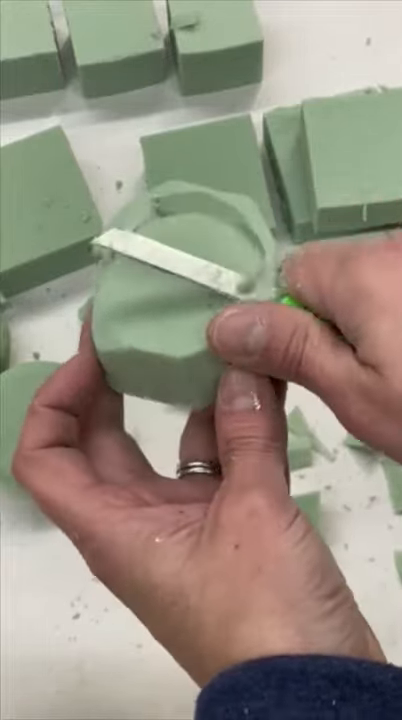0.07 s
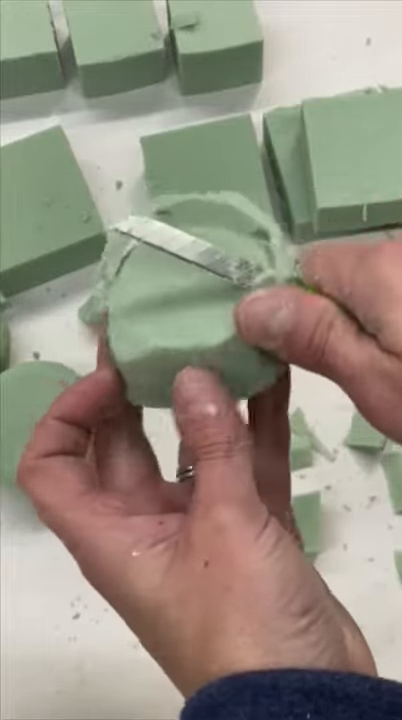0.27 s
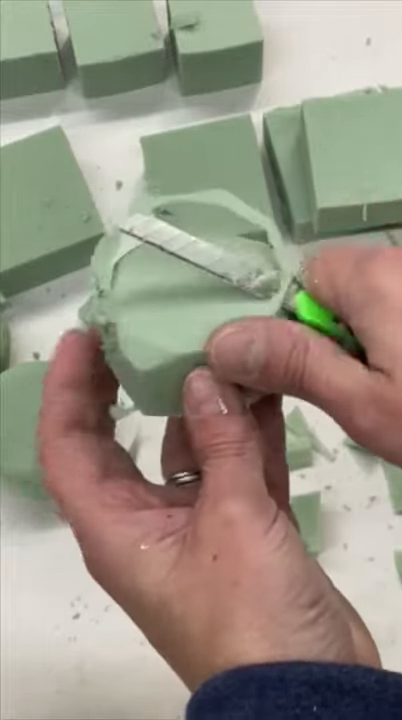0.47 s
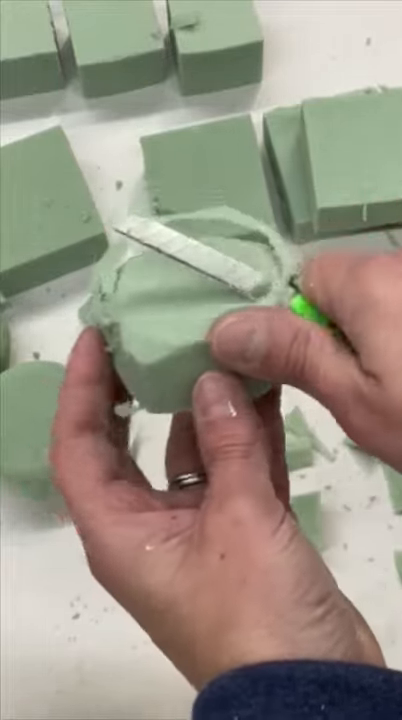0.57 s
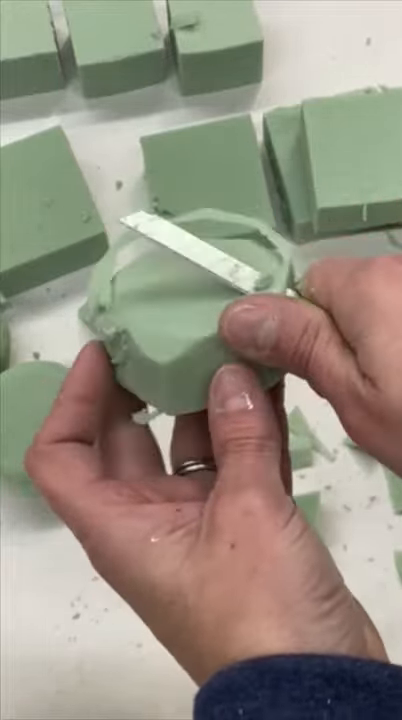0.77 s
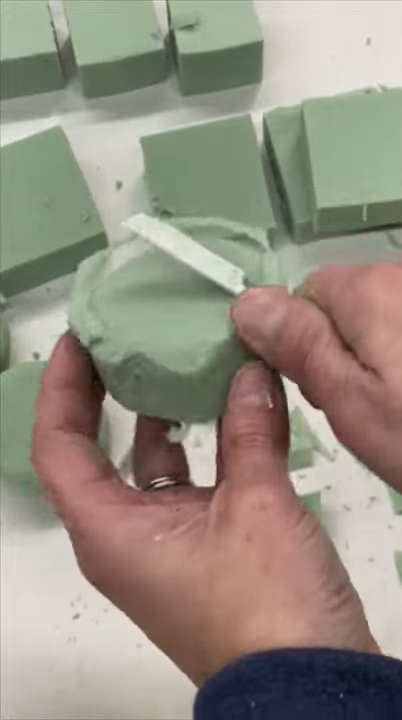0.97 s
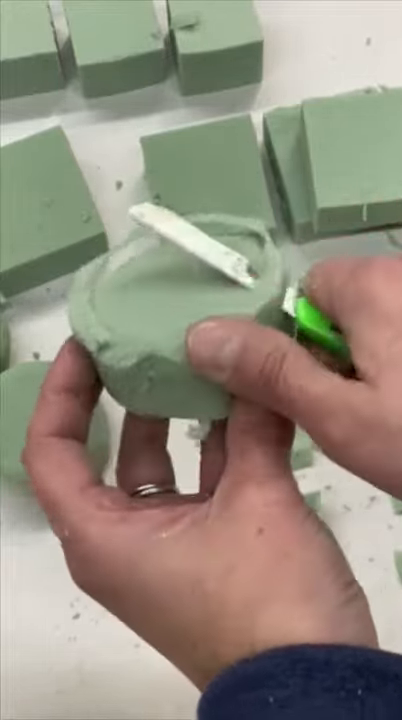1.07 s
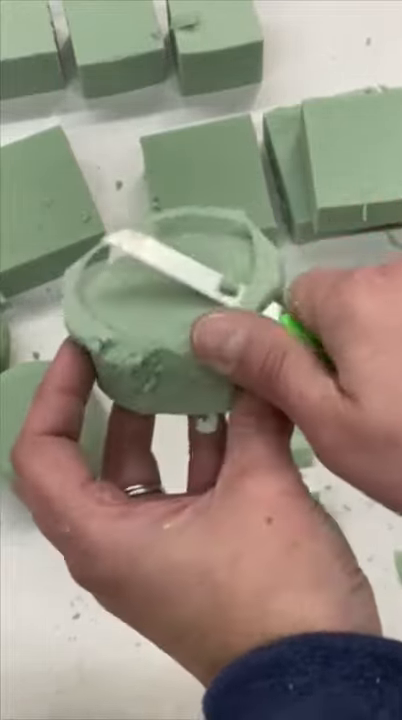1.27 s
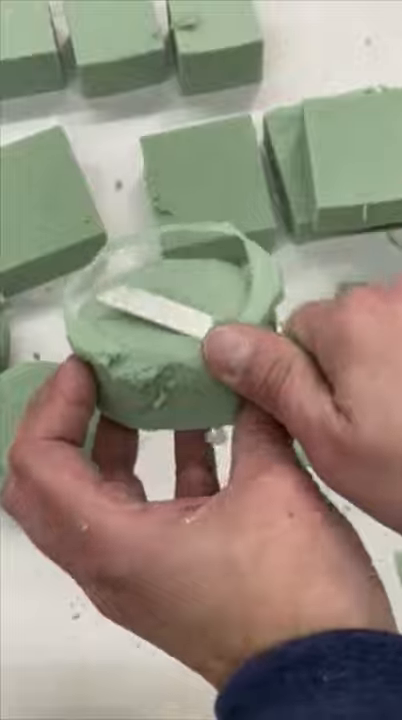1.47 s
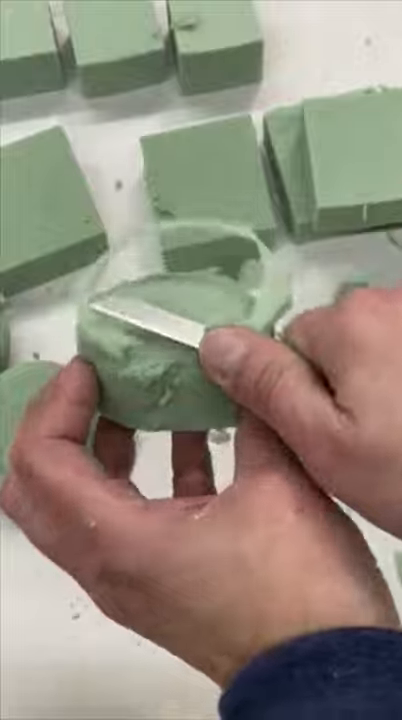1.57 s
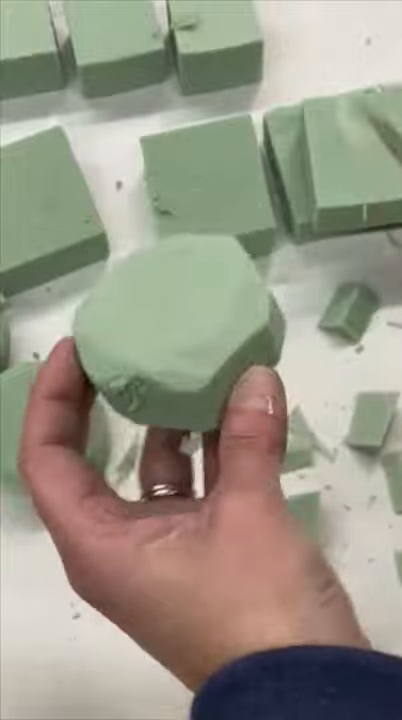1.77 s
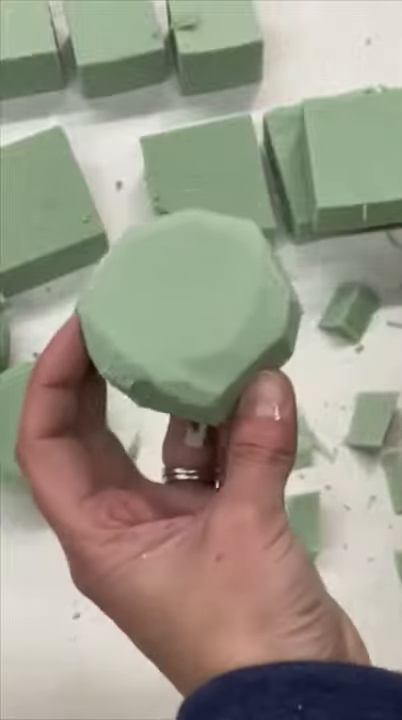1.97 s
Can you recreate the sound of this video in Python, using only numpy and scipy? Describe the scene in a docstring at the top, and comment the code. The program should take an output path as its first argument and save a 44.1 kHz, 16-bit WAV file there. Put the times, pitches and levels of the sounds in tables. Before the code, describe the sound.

Crunchy knife cuts through brittle foam, close up, then faint finger rubs over a quiet hum.

```python
"""A box-cutter blade shaves the rim of a disc of dry floral foam, close to a phone above a craft table. From
the start a low hum sounds in the small room, over rumble and faint air noise, and the blade cuts: thousands of
brittle cells break as random clicks, filtered into a bright hiss and a lower crunch. Soft handling thuds (sines
that swell and fade) join in, then flakes that snap off (an impulse and a burst of crumbs) and fingers that
brush the foam (filtered grain); brushing and thuds outlast the cuts."""
import sys
import numpy as np
from scipy import signal
from scipy.fft import rfft, irfft
from scipy.io import wavfile
from scipy.ndimage import map_coordinates

SR = 44100
rng = np.random.default_rng(int(sys.argv[2]) if len(sys.argv) > 2 else 0)


def waveform_to_disk(signal):
    """Save audio, clipped to [-1, 1], as 16-bit WAV at the path in sys.argv[1]."""
    frames = np.transpose(np.atleast_2d(signal))
    scaled = np.clip(frames, -1, 1) * 32767
    samples = np.round(scaled).astype(np.int16)
    wavfile.write(sys.argv[1], SR, samples)


N = 89258  # samples
T = np.arange(N) / SR  # time in seconds
FFT_SIZE = 131072
FREQS = np.arange(FFT_SIZE // 2 + 1) * SR / FFT_SIZE  # Hz
OPPOSITE = np.array([[1], [-1]])  # signs of left and right


def undb(db):
    """Level law: an amplitude ratio is 10 to the power of dB / 20."""
    return 10 ** (np.asarray(db) / 20)


def shape_db(points):
    """Spectral envelope: joins (Hz, dB) points by straight lines on a log-frequency axis."""
    hz, db = np.array(points, float).T
    return np.interp(np.log(FREQS + 1), np.log(hz), db)


def bell(hz, width_hz):
    """Resonance curve: a Gaussian of height 1 on the frequency axis."""
    return np.exp(-((FREQS - hz) / width_hz) ** 2)


def colour(x, db):
    """Minimum-phase filtering: a causal filter of the given dB shape that keeps the power of white noise."""
    gain = undb(db)
    gain = gain / np.sqrt(np.mean(gain ** 2))
    # folding the cepstrum onto positive time makes the filter causal
    cepstrum = irfft(np.log(gain + 1e-9))
    cepstrum[1:FFT_SIZE // 2] *= 2
    cepstrum[FFT_SIZE // 2 + 1:] = 0
    response = np.exp(rfft(cepstrum))
    return irfft(rfft(x, FFT_SIZE) * response)[..., :N]


def walk(rate):
    """Random modulation: joins `rate` random values per second, scaled to a spread of 1."""
    wander = np.interp(T * rate, np.arange(N), rng.standard_normal(N))
    return wander / wander.std()


def cells(rate, spread_db, scatter_db=-13):
    """Shot noise: random clicks of breaking cells, partly common to both sides and partly separate."""
    size = undb(spread_db * np.minimum(rng.exponential(size=(3, N)), 6))
    struck = rng.random((3, N)) < rate / SR
    clicks = struck * size * rng.choice([-1, 1], (3, N))
    both_sides = clicks[0] + undb(scatter_db) * clicks[1:]
    return both_sides / both_sides.std()


def hum():
    """Harmonic series: a low hum drones on a fundamental and its multiples, wavering slightly."""
    fundamental_hz, waver_db, waver_cycles = 59.0, 0.55, 0.0067
    # Each row: multiple of the fundamental, level before the waver in dB.
    partials = [(1, -36.5), (2, -55), (3, -57), (4, -71.5)]
    phase = 2 * np.pi * (fundamental_hz * T + waver_cycles * walk(5.5))
    out = 0
    for multiple, db in partials:
        level = np.sqrt(2) * undb(db + waver_db * walk(8.77))
        out = out + level * np.sin(multiple * phase + 2 * np.pi * rng.random())
    return out


def air():
    """Diffuse noise: low rumble and faint hiss, strongly correlated between the two sides."""
    level_db, side_db = -43, -16.5  # the side part is relative to the middle
    # Spectrum of the room noise. Each row: frequency in Hz, relative level in dB.
    air_shape = [(20, -12), (40, -5.5), (60, 17.5), (80, -3.5), (108, 6), (135, -7.5), (200, -5.5),
                 (270, -21), (340, -11.5), (500, -22), (1000, -31), (2500, -32), (6000, -60), (16000, -41)]
    mid, side = colour(rng.standard_normal((2, N)), shape_db(air_shape))
    return undb(level_db) * (mid + undb(side_db) * side * OPPOSITE)


def ripple(x):
    """Interference: chance peaks and dips from hollows of hands and foam shift as the blade travels."""
    depth_db, spacing_hz, spacing_s = 2.9, 140, 0.08
    hz, t, bands = signal.stft(x, SR, nperseg=512)
    place = np.meshgrid(hz / spacing_hz, t / spacing_s, indexing="ij")
    field = map_coordinates(rng.standard_normal(bands.shape[1:]), place, order=1)
    gain = undb(depth_db * field / field.std())
    gain = gain / np.sqrt(np.mean(gain ** 2))
    return signal.istft(bands * gain, SR)[1][:, :N]


def cuts():
    """Brittle fracture: a juddering blade breaks single cells as hiss and clumps of cells as crunch."""
    # Course of each cut. Each row: time in seconds, hiss level in dB before the cut's gain,
    # crunch relative to hiss in dB before the common crunch lift.
    cut_1 = [(0.0, -26.5, -15), (0.029, -31.0, -16), (0.077, -31.5, -19), (0.085, -38.0, -17),
             (0.097, -29.5, -19), (0.145, -43.5, -13), (0.153, -38.0, -18), (0.17, -50.0, -11)]
    cut_2 = [(0.285, -51.0, -10), (0.305, -40, -15), (0.322, -33, -20), (0.37, -32.5, -22),
             (0.41, -33, -23)]
    cut_3 = [(0.41, -31.5, -22), (0.426, -33.5, -19), (0.466, -28.0, -19), (0.478, -41.0, -12),
             (0.486, -31.5, -19), (0.502, -37.0, -19), (0.525, -39.5, -15)]
    cut_4 = [(0.525, -43.0, -13), (0.534, -26.5, -22), (0.57, -26, -22), (0.574, -30.0, -18),
             (0.594, -25.5, -20), (0.622, -32.0, -17), (0.626, -37.5, -15), (0.646, -37.0, -18),
             (0.65, -44.5, -12), (0.665, -26.5, -21), (0.677, -28.0, -19), (0.685, -37, -14),
             (0.725, -31.5, -17), (0.737, -42, -12)]
    cut_5 = [(0.737, -45.0, -10), (0.769, -30.0, -16), (0.821, -30.5, -17), (0.829, -25.0, -14),
             (0.845, -32.0, -13), (0.885, -29.5, -13), (0.969, -41.5, -13), (0.985, -49.5, -11),
             (1.0, -40.5, -18)]
    cut_6 = [(1.0, -43, -15), (1.017, -37.0, -15), (1.033, -42, -9), (1.061, -38.0, -12),
             (1.073, -32.0, -15), (1.085, -34.5, -13), (1.1, -25.5, -15), (1.125, -24, -14),
             (1.17, -27, -14)]
    cut_6_end = [(1.17, -27, -12), (1.2, -28.5, -12), (1.222, -28.5, -12), (1.23, -32, -12)]
    cut_7 = [(1.23, -35.0, -11), (1.238, -27.0, -14), (1.33, -28.0, -17), (1.334, -31.0, -13),
             (1.346, -24.5, -18), (1.366, -31.5, -13), (1.374, -21.0, -20), (1.387, -32.5, -15)]
    cut_8 = [(1.387, -32.0, -17), (1.4, -24, -20), (1.428, -25, -20), (1.438, -23, -20), (1.451, -28, -17),
             (1.458, -22.0, -21), (1.469, -21, -22), (1.48, -27, -15), (1.488, -40.5, -14),
             (1.54, -56.0, -12)]
    # Resonances and notches of the hollow that hands and foam form in each cut.
    # Each row: frequency in Hz, height in dB, width in Hz.
    grip_1 = [(520, 8, 250), (1300, 6, 180), (1650, -6, 100), (3150, 3.5, 350), (3950, -12, 250),
              (4850, -5, 150), (5800, 4, 700)]
    grip_2 = [(1950, -8, 200), (2550, 3, 300), (3420, -14, 200), (4940, 8.5, 2100)]
    grip_3 = [(1780, -10, 170), (3650, 0.5, 550), (11730, 2, 770)]
    grip_4 = [(1340, 8, 100), (3520, 2.5, 680), (4830, -3.5, 720)]
    grip_5 = [(616, -3, 190), (2550, 1.5, 180), (3960, -2, 91), (4540, 2.5, 890)]
    grip_6 = [(880, -5, 120), (2900, 3, 900), (3800, 4, 200), (4270, 8, 170), (4620, -13, 130)]
    grip_6_end = [(890, -12, 44), (3200, 3.5, 600), (4650, -15, 390)]
    grip_7 = [(1400, -7, 150), (2550, 3, 300), (3430, -17, 130), (4250, -5, 250), (8700, 3, 930)]
    grip_8 = [(1330, -6, 400), (2080, -3, 130), (3320, -20, 170), (3750, 3, 200), (5500, 2, 950)]
    # Each row: course, hollows, gain in dB, spectral tilt in dB per octave.
    strokes = [
        (cut_1, grip_1, 0.33, -0.16),
        (cut_2, grip_2, 0, -0.24),
        (cut_3, grip_3, 0, 0),
        (cut_4, grip_4, 0, 0),
        (cut_5, grip_5, 0, 0),
        (cut_6, grip_6, 0.12, -0.057),
        (cut_6_end, grip_6_end, 0, 0.018),
        (cut_7, grip_7, 0.57, 0),
        (cut_8, grip_8, 0.24, -0.24),
    ]
    # Spectra of breaking cells and clumps. Each row: frequency in Hz, relative level in dB.
    hiss_shape = [(700, -79), (2000, -27.5), (2800, -15), (3800, -4), (4700, -2), (5500, 0), (6400, -1),
                  (7600, -4.5), (8300, 8.5), (9400, -2.5), (10800, 2.5), (12500, 1), (16000, -8)]
    crunch_shape = [(120, -24), (250, -7), (380, -2.5), (600, -2.5), (900, -9), (1200, -4.5), (1650, 2),
                    (2080, -3.5), (2500, -1), (3200, 0), (5000, -26), (9000, -99)]
    crunch_lift_db, blend_s = 1.5, 0.002

    judder = undb(1.3 * walk(160) + 1.5 * walk(600))  # spreads in dB, rates per second
    judder = judder / np.sqrt(np.mean(judder ** 2))
    fine = judder * cells(rate=11000, spread_db=3.1)
    lumps = undb(1.1 * walk(80))
    coarse = judder * lumps * cells(rate=2200, spread_db=2.4, scatter_db=-8.5)
    octaves = np.log2(np.maximum(FREQS, 2000) / 7000)  # the tilt is level below 2000 Hz
    out = 0
    for course, hollows, gain_db, tilt_db in strokes:
        t, db, crunch_db = np.array(course).T
        contact = np.clip(np.minimum(T - t[0], t[-1] - T) / blend_s + 0.5, 0, 1)
        force = contact * undb(np.interp(T, t, db) + gain_db)
        bite = force * undb(crunch_lift_db + np.interp(T, t, crunch_db))
        grip = tilt_db * octaves
        for hz, peak_db, width_hz in hollows:
            grip = grip + peak_db * bell(hz, width_hz)
        out = out + colour(fine * force, shape_db(hiss_shape) + grip)
        out = out + colour(coarse * bite, shape_db(crunch_shape) + grip)
    return ripple(out)


def bumps():
    """Enveloped sine: as the hands shift their hold, a soft, low thud swells and fades over a few cycles."""
    half_width_s = 0.031  # from the middle to 1/e
    # Each row: middle in seconds, envelope peak in dB, frequency in Hz.
    thuds = [(0.08, -40, 100), (0.56, -43, 108), (0.88, -42, 112), (1.04, -39, 104), (1.43, -43, 112),
             (1.55, -44, 95), (1.95, -44, 108)]
    out = 0
    for middle, db, hz in thuds:
        age = T - middle
        envelope = undb(db) * np.exp(-(age / half_width_s) ** 2)
        out = out + envelope * np.sin(2 * np.pi * (hz * age + rng.random()))
    return out


def snaps():
    """Impulsive release: a flake breaks with one dry crack; a burst of crumbs swells and dies."""
    # Each row: start in seconds, energy of the crack in dB, energy of the crumbs in dB,
    # time for the crumbs to swell in seconds.
    flakes = [ (0.1465, -16, -11, .001), (0.5056, -22, -12, .0015), (0.534, -20, -7, .002),
              (0.6615, -18, -4, .0015), (0.7425, -26, 1.5, .003), (0.7885, -10, -12, .0005),
              (0.7958, -5, -8, .0005), (0.8151, -5, -6, .0005), (0.8585, 2.5, 3.5, .0011),
              (0.8994, -.5, .5, .0005), (0.9788, -5, -6, .0004), (0.9897, -9, -10, .0005),
              (1.0189, 1, 2, .0004), (1.0240, -22, -9, .0009), (1.067, -13, -11, .0006),
              (1.328, -8, -7, .0007), (1.411, -4, -6, .001), ]
    # Spectrum of a snap. Each row: frequency in Hz, relative level in dB.
    snap_shape = [(200, -18), (1000, -11), (2500, -6.5), (4000, -3), (5600, 5.5), (6800, 10), (8000, 10.5),
                  (10500, 9.5), (13000, 7.5), (16000, 2)]
    crumbs = cells(rate=20000, spread_db=1.5, scatter_db=0)
    out = np.zeros((2, N))
    for start, crack_db, crumble_db, crumble_s in flakes:
        i = int(start * SR)
        age = T[:N - i] / crumble_s
        burst = crumbs[:, i:] * age * np.exp(-age)
        burst = burst / np.linalg.norm(burst, axis=1, keepdims=True)  # unit energy
        out[:, i:] += undb(crumble_db) * burst
        out[:, i] += undb(crack_db)
    return colour(out, shape_db(snap_shape))


def rubs():
    """Sliding friction: fingertips excite fine grain in the foam, with a faint ring, and ease off."""
    attack_s, release_s, sag_db_per_s = 0.01, 0.015, 57
    ring_db, ring_width_hz = 9, 220
    # Each row: start in seconds, length in seconds, level before the sag in dB, resonance in Hz.
    strokes = [(0.16, 0.07, -50, 5200), (0.213, 0.052, -48, 7900), (0.244, 0.084, -47, 4400),
               (1.532, 0.055, -56, 4730), (1.584, 0.049, -47.5, 4730), (1.631, 0.035, -51, 5150),
               (1.665, 0.071, -49.5, 4640), (1.731, 0.052, -52, 4940), (1.773, 0.091, -55, 5900),
               (1.842, 0.032, -55, 5740), (1.859, 0.049, -47.5, 5530), (1.904, 0.083, -57.5, 5440),
               (1.969, 0.085, -53.5, 4470)]
    # Spectrum of the friction. Each row: frequency in Hz, relative level in dB.
    rub_shape = [(500, -1.5), (2200, -4), (3000, 1), (4100, 3.5), (5000, 5), (6500, 4.5), (7600, 4),
                 (10000, 5.5), (13000, 5.5), (16000, -0.5)]
    grain = cells(rate=7700, spread_db=-2.0) * undb(1.0 * walk(240))
    out = 0
    for start, length, db, hz in strokes:
        age = T - start
        attack = np.clip(age / attack_s, 0, 1)
        release = np.clip((length - age) / release_s + 0.25, 0, 1)
        force = attack * release * undb(db - sag_db_per_s * np.maximum(age, 0))
        out = out + colour(grain * force, shape_db(rub_shape) + ring_db * bell(hz, ring_width_hz))
    return out


def space(x):
    """Stereo phase and reverberation: left leads right by a phase that grows in steps; a room tail follows."""
    t60_s, room_db = 0.1, -16
    # Stereo phase by which left leads right. Each row: frequency in Hz, lead in radians.
    stereo_phase = [(0, 0), (5100, .05), (5800, .9), (6700, 3.1), (8200, 3.2), (9700, 6.2), (11300, 6.3),
                    (12600, 9.3), (14700, 9.5), (15400, 12.4)]
    lead = np.interp(FREQS, *np.array(stereo_phase).T)
    shift = np.exp(0.5j * lead * OPPOSITE)  # half the lead on each side
    direct = irfft(rfft(x, FFT_SIZE) * shift)[:, :N]
    tail = rng.standard_normal((2, N)) * np.exp(-np.log(1000) * T / t60_s)
    tail = tail / np.linalg.norm(tail, axis=1, keepdims=True)
    return direct + undb(room_db) * signal.fftconvolve(x, tail, axes=1)[:, :N]


def scene():
    """Superposition: blade, flakes and fingers in the room add to thuds, hum and air."""
    foam = cuts() + snaps() + rubs()
    return space(foam) + bumps() + hum() + air()


def record(dry):
    """Band limitation: the phone cuts the top with a steep elliptic low-pass at 15800 Hz."""
    lowpass = signal.ellip(10, 0.2, 70, 15800, fs=SR, output="sos")  # ripple and stopband in dB
    return signal.sosfilt(lowpass, dry)


dry = scene()
out = record(dry)
waveform_to_disk(out)
```